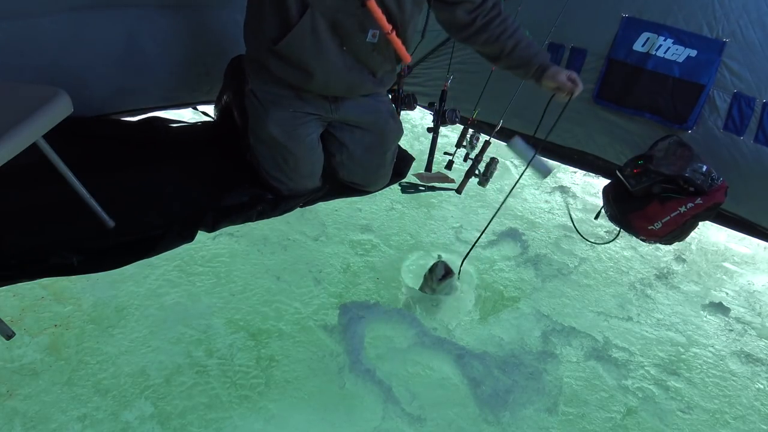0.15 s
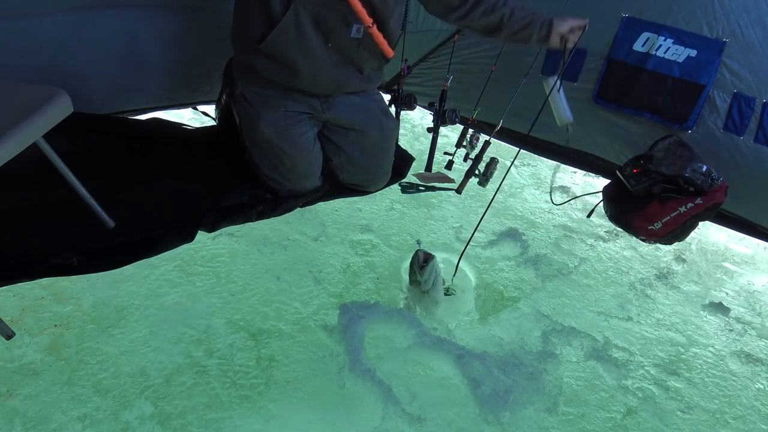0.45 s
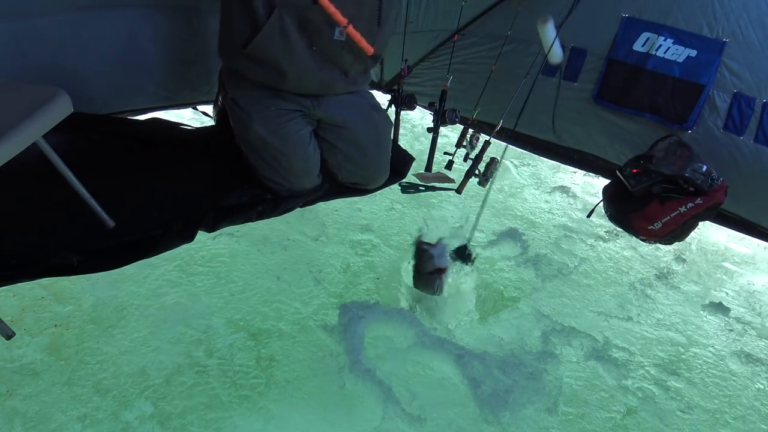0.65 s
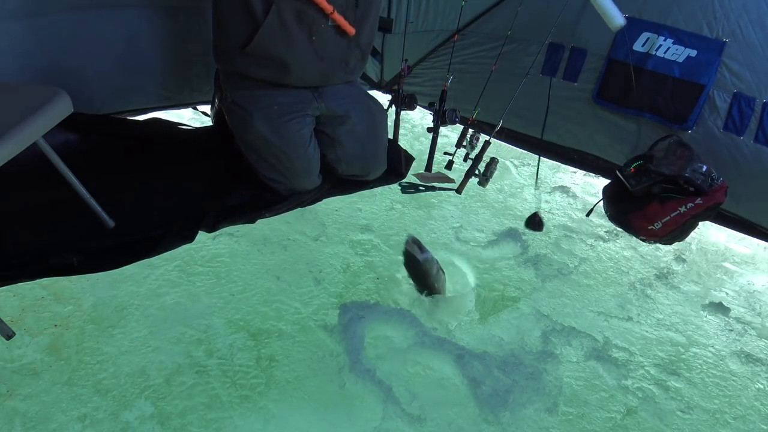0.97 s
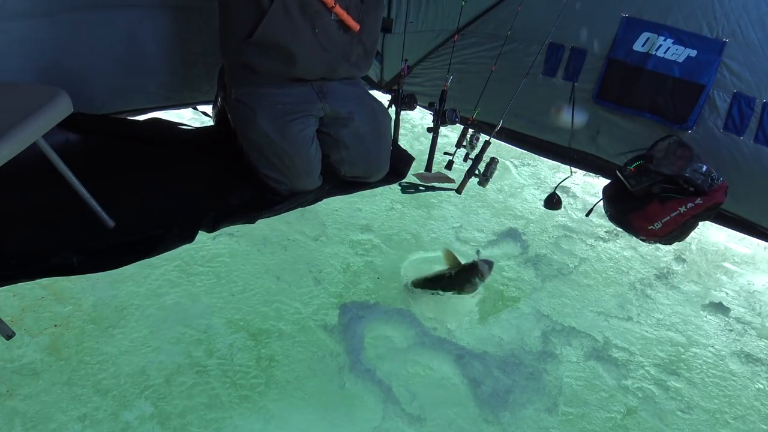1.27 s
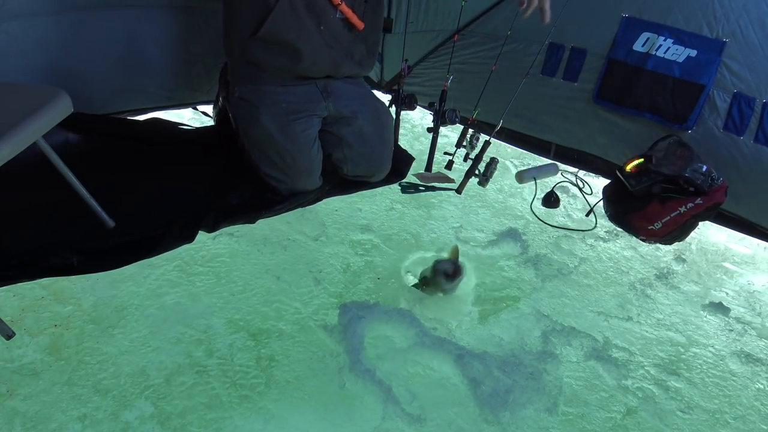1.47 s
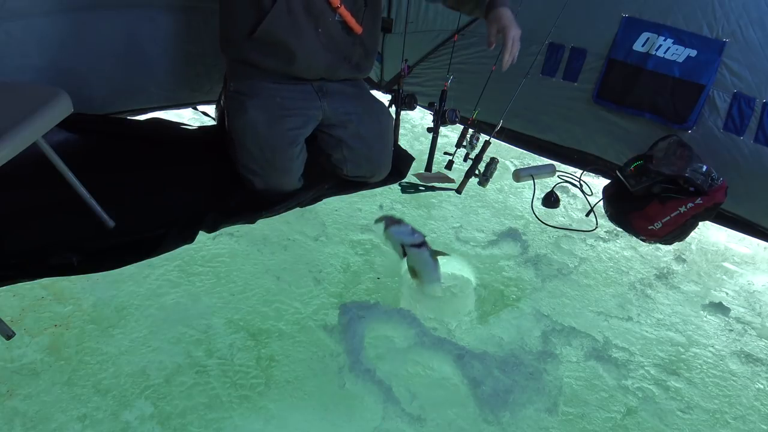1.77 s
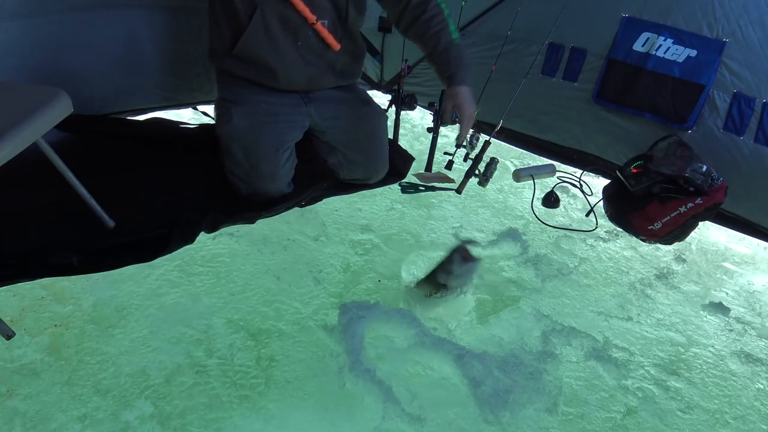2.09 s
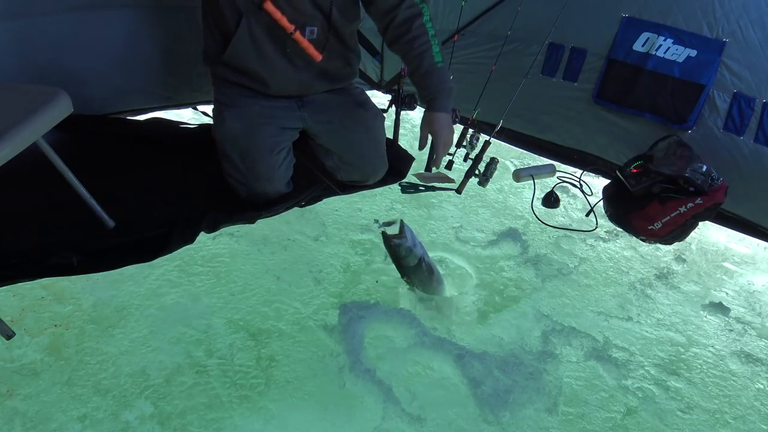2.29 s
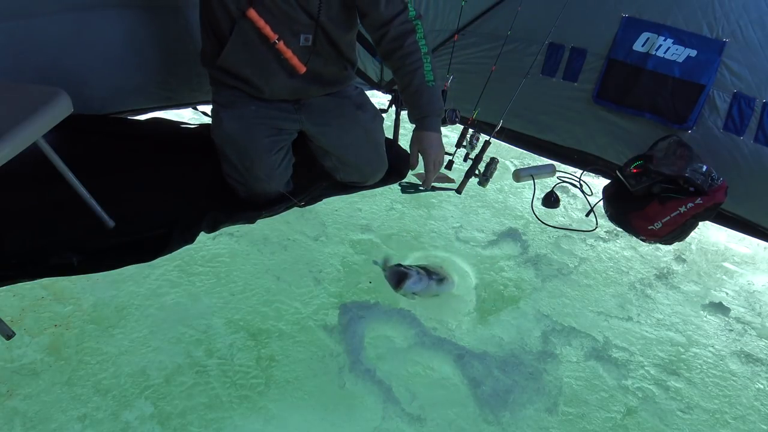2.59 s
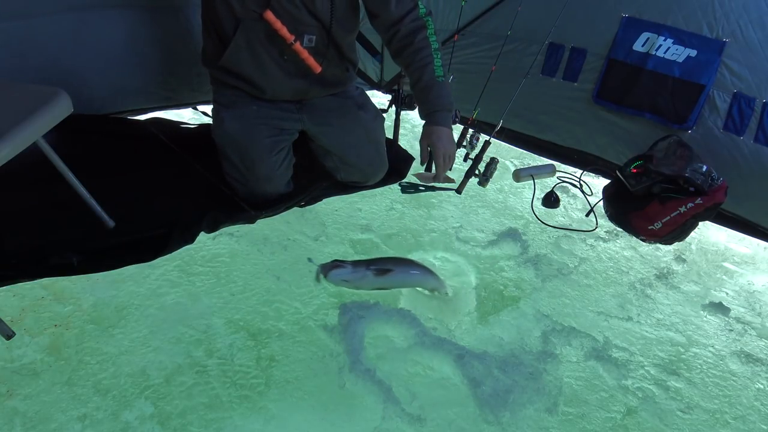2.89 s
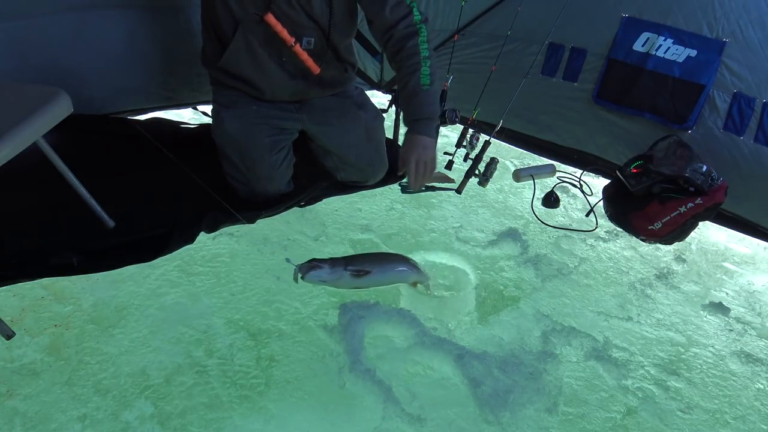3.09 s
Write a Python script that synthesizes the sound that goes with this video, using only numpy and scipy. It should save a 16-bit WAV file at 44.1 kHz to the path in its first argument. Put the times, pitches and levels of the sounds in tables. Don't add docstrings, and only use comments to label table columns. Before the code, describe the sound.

A big fish thrashes and splashes in a water-filled ice hole, smacking wet ice over low rumble.

```python
import sys
import numpy as np
from scipy import signal
from scipy.fft import rfft, irfft
from scipy.io import wavfile

SR = 44100
rng = np.random.default_rng(int(sys.argv[2]) if len(sys.argv) > 2 else 0)


def elevation(decibels):
    levels = np.asarray(decibels, float)
    return 10 ** (levels / 20)


def wrap_up_sound(samples):
    columns = np.atleast_2d(samples).T
    tamed = np.clip(columns, -1, 1)
    steps = np.round(tamed * 32767).astype(np.int16)
    wavfile.write(sys.argv[1], SR, steps)


N = 143325

# start_s, vigour_db, spray_db, slosh_db (spray and slosh relative to froth)
CHURN = [(0, -41.5, -3.5, 2.5), (.065, -50, -3, 2), (.18, -24.5, -10, -4.5), (.31, -26.5, -8.5, -3),
         (.44, -39, -9, 7.5), (.64, -36, -9, 8), (.82, -35, -10.5, 5), (.96, -24.5, -10.5, -4.5),
         (1.2, -35, 1.5, -4.5), (1.8, -38.5, -11.5, -0.5), (2.03, -30.5, -15.5, -3), (2.23, -39, -10, -2),
         (2.33, -32.5, -7, -12), (2.49, -43, -8, 0), (2.83, -57, 0, 12), (2.99, -48.5, -2.5, 3.5),
         (3.07, -35, -13.5, -6.5), (3.25, -45.5, -4, -5)]
# freq_hz, density_db (per Hz)
FROTH_SPECTRUM = [(1300, -3.5), (2500, -2), (3340, 1.5), (4130, -2), (5400, -2.5), (8000, -21.5)]
SPRAY_SPECTRUM = [(5500, -2), (7000, -2), (12000, -4.5), (15700, -5)]
SLOSH_SPECTRUM = [(200, -15.5), (290, -10), (420, -7), (800, -3.5), (1150, -2.5), (1500, -10.5),
                  (1900, -7.5)]
# start_s, peak_db, pitch_hz, rise_s, t60_s
POCKETS = [(0, -33, 1590, 0.004, 0.12), (0.075, -27.5, 12400, 0.0012, 0.063),
           (.653, -15, 2350, 0.0012, 0.037), (0.757, -11.5, 917, 0.0074, 0.033),
           (1.138, -18, 2750, .002, 0.035), (1.334, -30.5, 948, 0.014, 0.077),
           (1.636, -31, 10400, 0.001, 0.05), (1.646, -29, 10400, 0.001, 0.06), (.73, -20, 2550, .002, .03),
           (.712, -21, 5100, .002, .03), (2.826, -40, 1550, .004, .15), (1.34, -25, 2750, .008, .06),
           (1.91, -13.5, 799, 0.013, 0.083), (2.04, -20, 1164, 0.051, 0.036),
           (2.333, -17, 1149, 0.001, 0.12), (2.518, -24, 1233, 0.0025, 0.16),
           (2.621, -11, 704, 0.0073, 0.036), (2.647, -25.5, 672, 0.017, 0.099)]
# start_s, level_db
HEATER = [(0, -43), (2.1, -43), (2.6, -39), (3.25, -41)]
# freq_hz, density_db (per Hz)
RUMBLE_SPECTRUM = [(20, -9.5), (65, -6.5), (88, 2.5), (113, -1.5), (146, -9), (200, -15.5)]
# freq_hz, density_db (per Hz)
ROOM_SPECTRUM = [(140, -3.5), (300, -3), (650, -7), (3900, -59), (16000, -61)]
# start_s, peak_db, pitch_hz
TICKS = [(.0225, -36, 8500), (.0752, -21, 12500), (.211, -14, 9500), (.5132, -30, 9000), (.6789, -17, 8500),
         (.7447, -17, 8600), (1.011, -18, 5000), (1.409, -25, 12500), (1.4501, -11, 12000),
         (1.5374, -19, 9000), (1.548, -19, 11000), (1.604, -28, 12000), (1.636, -23, 9500),
         (1.6457, -19, 9500), (1.8093, -33, 9640), (1.87, -31, 12800), (1.901, -28, 8000),
         (1.9126, -25, 10000), (1.9314, -12, 3600), (2.046, -28, 14500), (2.05, -25, 8000),
         (2.078, -9, 11000), (2.0785, -5, 3600), (2.266, -15, 1700), (.687, -10, 1100), (.697, -9, 1000),
         (2.168, -30, 10500), (2.176, -28, 13500), (2.32, -27, 10500), (2.4818, -26, 14500),
         (2.509, -30, 9500), (2.5586, -18, 10900), (2.6125, -33, 7000), (2.7696, -36, 14000),
         (2.8255, -42, 7000), (2.8674, -30, 14000), (2.9652, -34, 9000), (3.0066, -33, 11900),
         (3.053, -31, 6200), (3.176, -32, 6500)]
# start_s, peak_db, ring_hz, t60_s, spray_db
SMACKS = [(0.0745, -22.5, 3070, 0.3, -18), (0.6549, -11, 2600, .3, -21.5), (.696, -20, 3120, 0.59, -11),
          (0.7424, -16, 2950, 0.1, -15), (0.896, -19, 3570, 0.17, -35), (1.041, -16.5, 5300, 0.3, 0.5),
          (1.05, -14.5, 4670, 0.37, -14), (1.1388, -12, 2700, 0.15, -12), (1.194, -21, 4830, 0.6, -23),
          (1.3379, -19, 2900, 0.2, -30), (1.4484, -8, 4580, 0.25, -8), (1.535, -36.5, 5550, 0.45, 9.5),
          (1.9302, -12.5, 3040, 0.15, -41), (2.074, -15, 3200, 0.12, -16), (2.5072, -28, 5200, 0.2, -22),
          (2.62, -26, 3240, 0.4, -22), (2.682, -18, 3200, 0.13, -18)]
# start_s, level_db
CORD = [
    (.34, -60),
    (.43, -35),
    (.58, -33),
    (.65, -33),
    (.68, -70),
]
# freq_hz, width_hz, level_db
CORD_RINGS = [(835, 250, -2), (1144, 90, 0), (1860, 90, -8), (2195, 90, -7), (3320, 35, 1), (4850, 70, -14)]
# start_s, rms_db, pitch_hz, rise_s, t60_s
GULPS = [(.653, -19, 1020, 0.001, 0.4), (.685, -15.5, 840, 0.0083, 0.13), (0.741, -16, 880, 0.0023, 0.14),
         (2.682, -18, 1945, 0.001, 0.09), (.89, -25, 940, 0.013, 0.43), (1.054, -16, 820, 0.0013, 0.14),
         (1.452, -17, 760, 0.003, 0.06), (1.45, -23, 280, 0.0037, 0.05), (1.666, -26, 1150, 0.012, 0.12),
         (1.646, -28, 1980, 0.008, 0.2), (1.93, -17, 790, 0.0011, 0.17), (1.934, -28, 420, 0.0039, 0.18),
         (2.073, -14.5, 970, 0.0017, 0.16), (2.202, -28, 816, 0.002, 0.12), (2.203, -31, 1650, .001, .15),
         (2.264, -22, 1330, 0.001, 0.2), (2.305, -28, 1850, .006, .08), (2.37, -28, 980, 0.03, 0.2),
         (2.291, -27, 3300, 0.029, 0.052), (2.542, -30.5, 3500, 0.0062, 0.04),
         (2.686, -31, 846, .004, 0.14), (2.69, -34, 388, 0.0043, 0.18), (2.72, -26, 2380, 0.0027, 0.05),
         (2.875, -40.5, 2780, 0.0098, .4), (2.878, -44, 6000, .006, .3), (3.109, -32, 3600, 0.018, 0.17),
         (2.279, -30.5, 5070, 0.0048, 0.4), (1.452, -19, 1200, .003, .05), (1.4495, -19, 2200, .001, .06),
         (1.452, -22, 460, .003, .04), (1.855, -30, 2200, .004, .12), (2.08, -21, 3100, .02, .14),
         (2.082, -26, 5600, .025, .12), (2.08, -34, 10500, .02, .14), (2.615, -36, 7000, .006, .3),
         (2.385, -29, 1950, .004, .1), (.89, -22, 1900, .002, .06), (.91, -26, 2500, .02, .25),
         (3.017, -37, 3200, .004, .2), (1.545, -30, 8900, .004, .06)]
# start_s, rms_db, from_hz, to_hz, length_s
CLOSINGS = [
    (.79, -27, 1100, 2100, .105),
    (2.045, -21, 1050, 2300, .04),
    (2.84, -33, 480, 900, .075),
]


def rms_one(x):
    return x / np.sqrt(np.mean(x ** 2) + 1e-20)


def in_time(rows):
    start_s, *columns = np.transpose(rows)
    return [np.interp(np.arange(N) / SR, start_s, column) for column in columns]


def white_noise():
    return rng.standard_normal(N)


def spatter(shape):
    strong = rng.random(shape) < .004
    return rng.standard_normal(shape) * (1 + 9 * strong)


def colour(x, spectrum, edge_db):
    hz, db = np.transpose(spectrum)
    octave = np.log2(np.arange(N // 2 + 1) * SR / N + 1)
    low, high = np.log2(hz[0]), np.log2(hz[-1])
    outside = np.maximum(low - octave, 0) + np.maximum(octave - high, 0)
    gain = elevation(np.interp(octave, np.log2(hz), db) - edge_db * outside)
    return rms_one(irfft(rfft(x) * gain, N))


def drift(rate_hz):
    r = np.exp(-80 * np.pi * rate_hz / SR)
    slow = signal.lfilter([1], [1, -2 * r, r * r], rng.standard_normal(N // 40 + 2002))[2000:]
    return np.interp(np.arange(N) / 40, np.arange(len(slow)), rms_one(slow))


def peak(x, hz, width_hz):
    r = np.exp(-np.pi * width_hz / SR)
    poles = [1, -2 * r * np.cos(2 * np.pi * hz / SR), r * r]
    return signal.lfilter([(1 - r * r) / 2, 0, (r * r - 1) / 2], poles, x + 1e-18)


def double_peak(x, hz, width_hz):
    return peak(peak(x, hz, width_hz), hz, 2 * width_hz)


def swell(t, rise_s, t60_s):
    rise = np.sin(np.pi / 2 * np.clip(t / max(rise_s, 1e-4), 0, 1)) ** 2
    return rise * elevation(-60 * np.maximum(t - rise_s, 0) / max(t60_s, .01))


def add(out, start_s, x):
    i = max(int(start_s * SR), 0)
    out[i:i + len(x)] += x[:len(out) - i]


def drops(per_s, spread_db, spectrum, cycles, hiss):
    sizes = elevation(spread_db * np.minimum(rng.exponential(1, N), 5)) * rng.choice([-1, 1], N)
    clicks = sizes * (rng.random(N) < per_s / SR)
    dealt = rng.integers(0, 24, N)
    pitches = np.geomspace(spectrum[0][0], min(spectrum[-1][0], 16000), 24)
    rings = sum(peak(clicks * (dealt == k), hz, 1.48 * hz / cycles) for k, hz in enumerate(pitches))
    darker = rms_one(signal.lfilter([1], [1, -.5], rings))
    return colour(darker + hiss * white_noise(), spectrum, edge_db=28)


def churn():
    vigour_db, spray_db, slosh_db = in_time(CHURN)
    froth = drops(3500, 2.19, FROTH_SPECTRUM, cycles=39.0, hiss=1.0)
    spray = drops(6000, 2.2, SPRAY_SPECTRUM, cycles=5.4, hiss=0.75)
    slosh = drops(1100, 1.7, SLOSH_SPECTRUM, cycles=15.5, hiss=1.0)
    gust_db = 1.3 * drift(25)
    water = elevation(0.47 * drift(26)) * froth
    water += elevation(spray_db + 0.2 * drift(31)) * spray
    water += elevation(slosh_db + 0.3 * drift(45)) * slosh
    return elevation(vigour_db + gust_db) * water


def pockets():
    out, t = np.zeros(N), np.arange(SR // 5) / SR
    wobble = drift(86)
    climb = 620
    for start_s, peak_db, hz, rise_s, t60_s in POCKETS:
        phase = 2 * np.pi * t * (hz + climb * t) + 0.65 * wobble[int(start_s * SR):][:len(t)]
        add(out, start_s, elevation(peak_db) * swell(t[:len(phase)], rise_s, t60_s) * np.sin(phase))
    return out


def air():
    rumble = elevation(in_time(HEATER)[0]) * colour(white_noise(), RUMBLE_SPECTRUM, edge_db=18)
    room = elevation(-52.5) * colour(white_noise(), ROOM_SPECTRUM, edge_db=12)
    return rumble + room


def ticks():
    out, t = np.zeros(N), np.arange(SR // 20) / SR
    noises = rng.standard_normal((len(TICKS), len(t)))
    for (start_s, peak_db, hz), noise in zip(TICKS, noises):
        click = double_peak(1.0 * (t == 0), hz, .5 * hz)
        hiss = swell(t, 0.0003, .008) * rms_one(double_peak(noise, hz, .5 * hz))
        add(out, start_s, elevation(peak_db - 0.2) * click / click.max() + elevation(peak_db - 12.5) * hiss)
    return out


def smacks():
    out, t = np.zeros(N), np.arange(SR // 2) / SR
    froth = drops(1400, 3.6, FROTH_SPECTRUM, cycles=20, hiss=.8)
    spray = drops(3000, 3.2, SPRAY_SPECTRUM, cycles=14, hiss=.9)
    noise = spatter(N)
    for start_s, peak_db, hz, t60_s, spray_db in SMACKS:
        i = int(start_s * SR)
        span = slice(i, i + len(t))
        ring = rms_one(peak(noise[span], hz, 0.2 * hz))
        body = froth[span] + elevation(0.5) * ring + elevation(spray_db + 7.0) * spray[span]
        shape = swell(t, .0015, t60_s) + elevation(-1) * swell(t, .0005, .022)
        snap = peak(1.0 * (t == 0), 0.52 * hz, .5 * hz)
        add(out, start_s, elevation(peak_db - 11.5) * shape * body + elevation(peak_db - 7) * snap / snap.max())
    return out


def cord():
    friction = white_noise()
    rings = np.zeros(N)
    for hz, width_hz, level_db in CORD_RINGS:
        rings += elevation(level_db + 2 * drift(21)) * rms_one(double_peak(friction, hz, width_hz))
    return elevation(in_time(CORD)[0]) * rms_one(rings)


def gulps():
    out, t = np.zeros(N), np.arange(SR // 2) / SR
    noises = spatter((len(GULPS), len(t)))
    for (start_s, rms_db, hz, rise_s, t60_s), noise in zip(GULPS, noises):
        shape = swell(t, rise_s, t60_s)
        burst = shape * peak(peak(noise, hz, .28 * hz), hz, .55 * hz)
        add(out, start_s, elevation(rms_db) * rms_one(burst) * np.sqrt(np.mean(shape ** 2)))
    return out


def closings():
    out = np.zeros(N)
    for start_s, rms_db, from_hz, to_hz, length_s in CLOSINGS:
        u = np.arange(int(length_s * SR)) / (length_s * SR)
        hz = from_hz * (to_hz / from_hz) ** (u ** 1.5)
        slow = signal.lfilter([1], [1, -1.95, .9506], rng.standard_normal((2, SR // 5)))
        a, b = slow[:, -len(u):]
        phase = 2 * np.pi * np.cumsum(hz) / SR
        band = rms_one(a * np.sin(phase) + b * np.cos(phase))
        add(out, start_s, elevation(rms_db) * np.sqrt(np.sin(np.pi * u)) * band)
    return out


def shelter(x):
    t = np.arange(SR // 4) / SR
    delay_s, t60_s, echo_db = 0.00364, 0.13, -8.5
    dull = signal.lfilter([.5], [1, -.5], rng.standard_normal(len(t)))
    tail = dull * elevation(-60 * t / t60_s) * (t > delay_s)
    return x + elevation(echo_db) * signal.fftconvolve(x, tail / np.sqrt(np.sum(tail ** 2)))[:N]


def scene():
    events = pockets() + ticks() + smacks() + gulps() + closings()
    return (churn() + shelter(events) + cord() + air())[None]


def band_limit(x):
    return signal.sosfilt(signal.butter(12, 16500, fs=SR, output="sos"), x)


def record(dry):
    rounded = .66 * np.tanh(dry / .66)
    top_cut = signal.cheby2(14, 60, 16350, fs=SR, output="sos")
    mix = signal.sosfilt(top_cut, rounded)
    return band_limit(mix)


dry = scene()
out = record(dry)
wrap_up_sound(out)
```